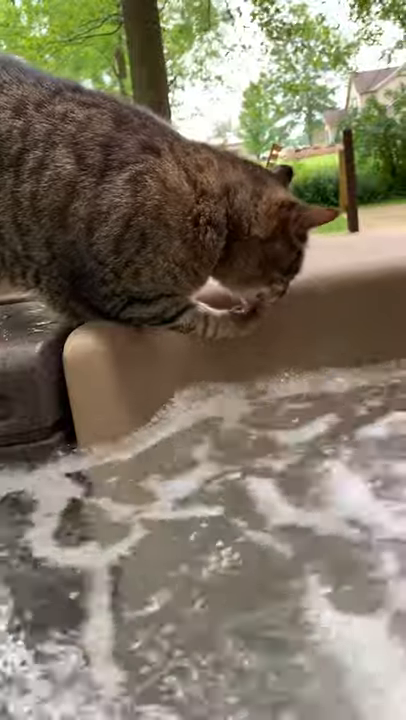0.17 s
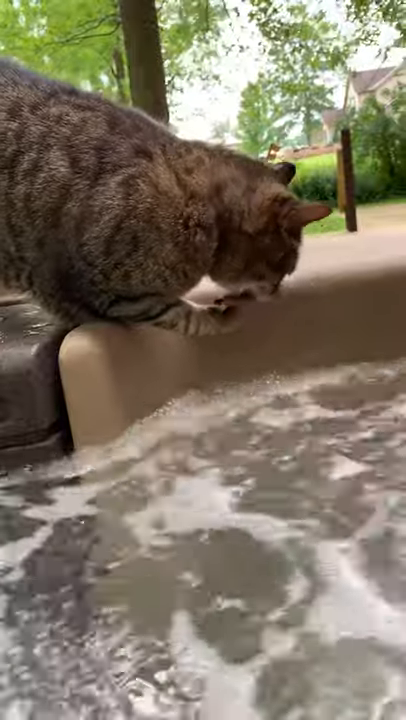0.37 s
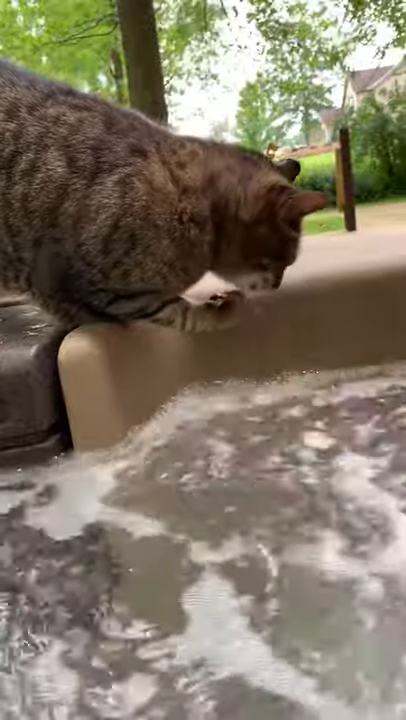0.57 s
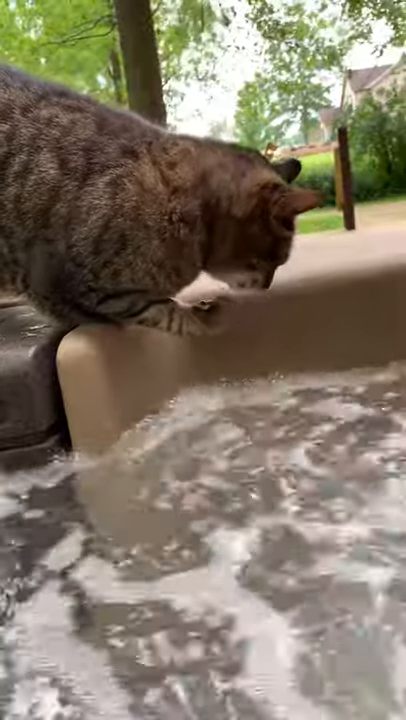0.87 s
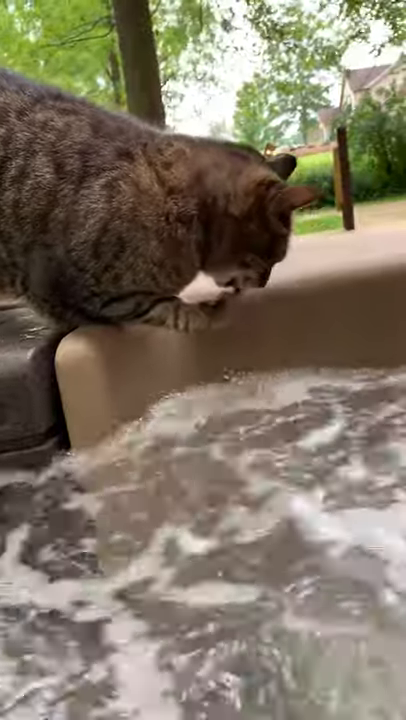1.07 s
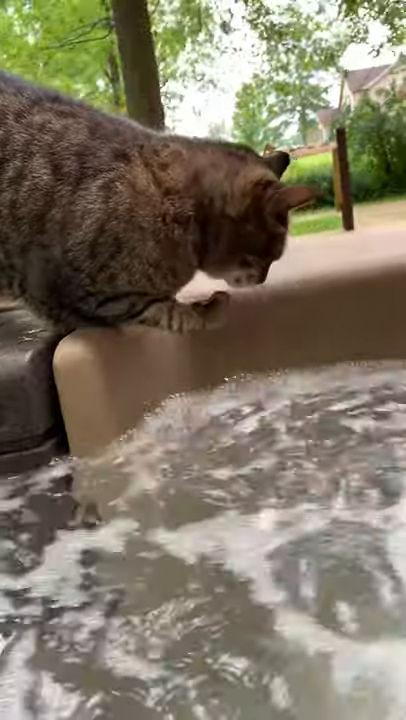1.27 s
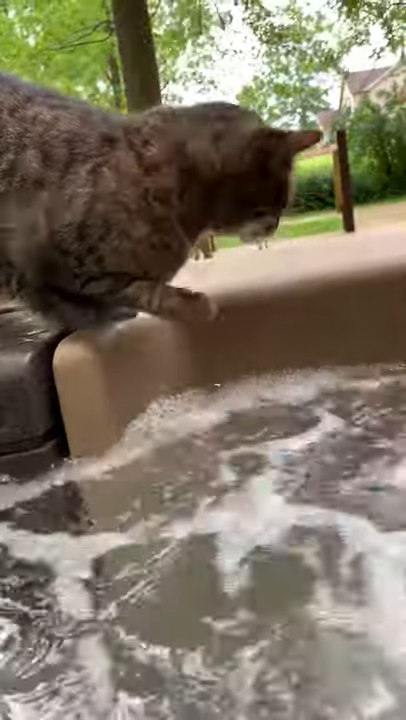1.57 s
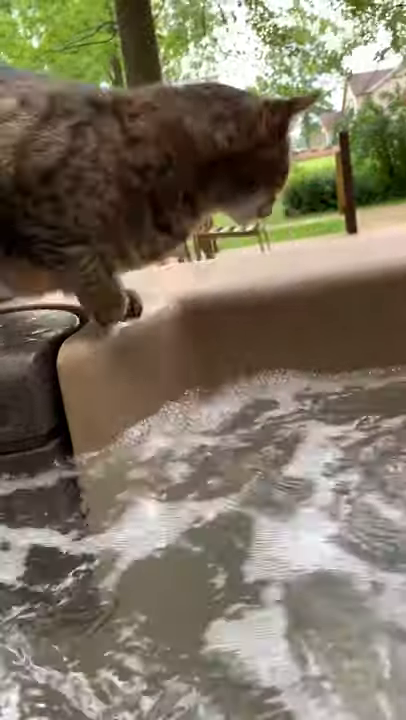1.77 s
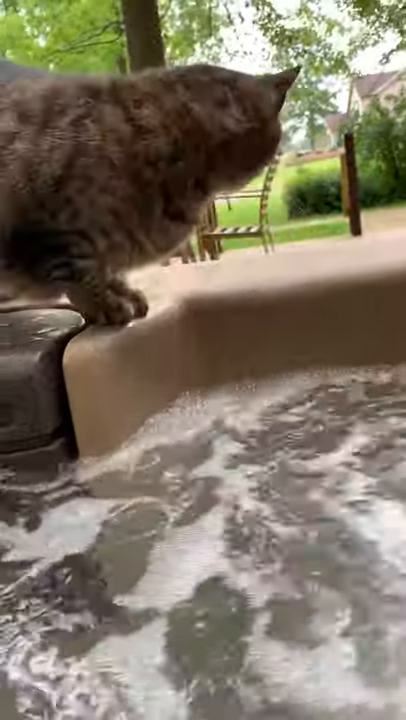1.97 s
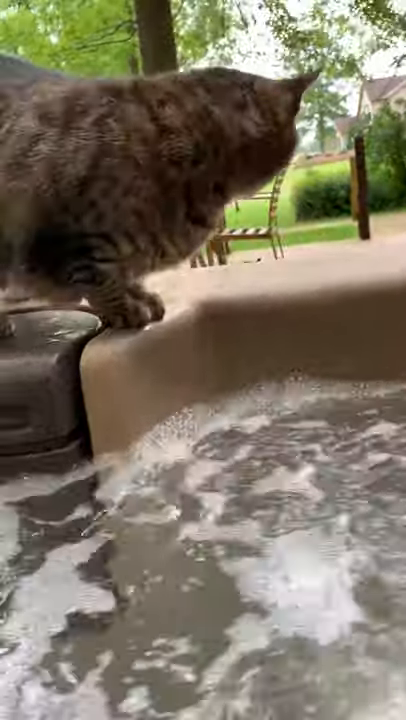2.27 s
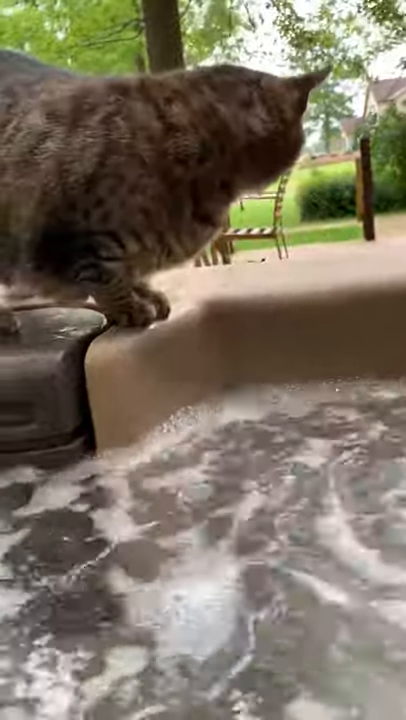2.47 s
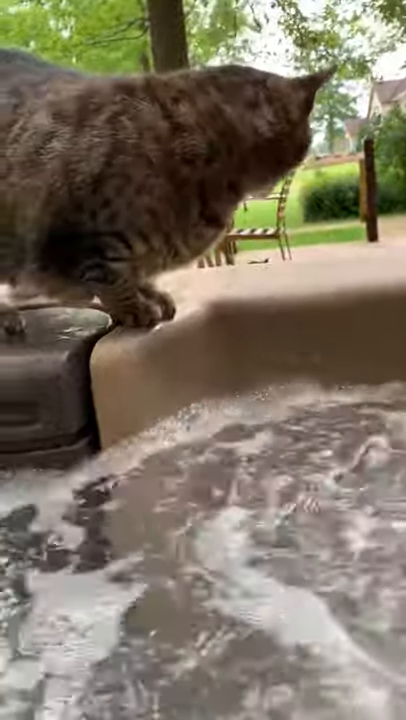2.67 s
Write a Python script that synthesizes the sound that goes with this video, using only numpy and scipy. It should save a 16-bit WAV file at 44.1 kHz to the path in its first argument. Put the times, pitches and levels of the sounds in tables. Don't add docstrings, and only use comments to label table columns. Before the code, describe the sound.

Hot tub jets churn water steadily, close to a phone outdoors: low surging rumble, gurgling bubbles and hissing foam, with scattered gulps, plops and drips, and a very faint distant bird whistling later on.

```python
import sys
import numpy as np
from scipy import signal
from scipy.fft import rfft, irfft, next_fast_len
from scipy.io import wavfile
from scipy.ndimage import uniform_filter1d, map_coordinates

SR = 44100
rng = np.random.default_rng(int(sys.argv[2]) if len(sys.argv) > 2 else 0)


def transcribe(u):
    v = np.clip(np.atleast_2d(u).T, -1, 1)
    q = np.round(v * 32767).astype(np.int16)
    wavfile.write(sys.argv[1], SR, q)


def makeup_ratio(level_db):
    decades = np.asarray(level_db, float) / 20
    return 10 ** decades


N = 125244
TIME_S = np.arange(N) / SR


def unit(x):
    return x / np.sqrt(np.mean(x ** 2) + 1e-20)


def along(points, hz):
    f, v = np.transpose(points)
    return np.interp(np.log(hz + 1), np.log(f + 1), v)


def over_time(points):
    return np.interp(TIME_S, *np.transpose(points))


def wobble(rate_hz):
    knots = rng.standard_normal(int(N * rate_hz / SR) + 4)
    return map_coordinates(knots, [np.arange(N) * rate_hz / SR])


def filtered(x, response):
    m = next_fast_len(N + 8192)
    return irfft(rfft(x, m) * response(np.fft.rfftfreq(m, 1 / SR)), m)[..., :N]


def rush(spectrum, patchy_db):
    z = signal.stft(rng.standard_normal((2, N)), nperseg=512)[2]
    field = uniform_filter1d(rng.standard_normal(z.shape[1:]), size=5, axis=0)
    field = uniform_filter1d(field, size=8, axis=1)
    pair = signal.istft(z * makeup_ratio(patchy_db * unit(field)), nperseg=512)[1][:, :N]

    def colour(hz):
        inside = (hz > spectrum[0][0]) & (hz < 1.5 * spectrum[-1][0])
        return makeup_ratio(along(spectrum, hz)) * inside
    return unit(filtered(pair, colour))


def bubbles(start_s, peak, pitch_hz, cycles, size_max):
    k = np.arange(size_max)
    life = k / SR * (pitch_hz / cycles)[:, None]
    rise = .05
    turns = cycles[:, None] * life * (1 + rise / 2 * np.minimum(life, 2))
    envelope = peak[:, None] * np.e * life * 2 * np.exp(-2 * life)
    wave = envelope * np.sin(2 * np.pi * turns)
    at = (start_s * SR).astype(int)[:, None] + k
    return np.bincount(at.ravel(), wave.ravel(), N + size_max)[:N]


def swarm(count, hz, octaves, cycles, spread_db, size_max):
    largest = .96

    def crowd():
        draw, z = rng.random((count, 2)), rng.standard_normal((count, 2))
        start_s = draw[:, 0] * N / SR
        peak = makeup_ratio(-spread_db * np.log(1 - largest * draw[:, 1]))
        pitch_hz = np.clip(hz * 2 ** (octaves * z[:, 0]), 250, 15000)
        return bubbles(start_s, peak, pitch_hz, cycles * np.exp(.4 * z[:, 1]), size_max)
    return unit(np.array([crowd(), crowd()]))


def air_pockets(surge_db):
    # freq_hz, level_db (per Hz)
    rumble_colour = [(12, -34), (20, -4), (92, 0), (160, -4), (210, -34), (350, -120)]
    steady, pocket_s = .85, .04
    rumble = rush(rumble_colour, patchy_db=.6)
    swell = np.abs(uniform_filter1d(rumble ** 2, size=int(pocket_s * SR))) + 1e-3
    return makeup_ratio(surge_db) * unit(rumble / swell ** (steady / 2))


def churn(swing_db):
    # freq_hz, level_db (per Hz)
    churn_colour = [(100, -30), (160, -4), (360, -3), (420, -8), (520, -6.5), (720, -14), (1250, -17),
                    (3600, -41)]
    # time_s, gain_db
    boil = [
        (0.1, 0),
        (.4, .8),
        (.55, -1),
        (.85, 1.5),
        (1.15, -.5),
        (1.4, 1),
        (1.9, -1),
        (2.3, -1),
        (2.45, -2),
        (2.8, 0),
    ]
    churn_db, bubbles_db, follow = -36.4, -53, .06
    gurgle = swarm(count=900, hz=1100, octaves=.9, cycles=5, spread_db=4, size_max=1000)
    body = makeup_ratio(churn_db) * rush(churn_colour, patchy_db=1.2) + makeup_ratio(bubbles_db) * gurgle
    return body * makeup_ratio(follow * swing_db + over_time(boil) + .3 * wobble(3) + .9 * wobble(17))


def foam(swing_db):
    # freq_hz, level_db (per Hz)
    foam_colour = [(500, -20), (1900, -2.5), (3400, -1.5), (5000, .4), (7000, -.5), (9500, -2),
                   (12000, -5.6), (15500, -9.5)]
    foam_db, sizzle_db, follow = -42.8, -56, .03
    sizzle = swarm(count=4000, hz=7000, octaves=.7, cycles=2.5, spread_db=4, size_max=100)
    body = makeup_ratio(foam_db) * rush(foam_colour, patchy_db=.7) + makeup_ratio(sizzle_db) * sizzle
    return body * makeup_ratio(follow * swing_db + .3 * wobble(4) + .4 * wobble(25))


def water():
    # time_s, level_db
    surge = [(0.1, -42), (1.0, -38), (1.05, -50), (1.1, -39), (1.2, -38), (1.23, -45), (1.3, -33),
             (1.35, -44), (1.38, -35), (1.43, -44), (1.47, -30), (1.73, -41), (2.1, -37), (2.16, -42),
             (2.19, -30), (2.23, -39), (2.81, -40), (2.83, -45)]
    surge_db = over_time(surge)
    swing_db = surge_db - surge_db.mean()
    return air_pockets(surge_db) + churn(swing_db) + foam(swing_db)


def drops():
    # start_s, peak_db, pitch_hz, life_cycles
    plinks = [(.4147, -37, 2720, 8), (.416, -42, 2100, 4), (.6117, -37, 2850, 7), (.616, -42, 1270, 12),
              (.636, -43, 2950, 14), (.642, -44, 3250, 16), (.712, -44, 3500, 30), (.926, -43, 2250, 20),
              (1.18, -39, 1250, 10), (1.29, -42, 1050, 16), (1.305, -43, 2650, 18), (2.2973, -43, 2610, 10),
              (2.6984, -44, 2870, 10), (2.255, -45, 3000, 20), (.265, -44, 2090, 6), (1.2607, -43, 2230, 5),
              (1.997, -44, 1970, 6), (2.15, -45, 3450, 25), (.478, -42, 1300, 6), (1.138, -41, 1000, 6),
              (1.262, -39, 1050, 9), (1.85, -46, 1550, 18), (2.656, -39, 900, 6), (2.714, -38, 1280, 9),
              (2.712, -40, 1520, 9), (.416, -36, 2300, 1.6), (.613, -37, 1900, 1.6), (1.515, -30, 45, 1.5),
              (2.175, -31, 94, 2.5), (2.8142, -38, 11000, 9), (2.8142, -36, 12400, 11),
              (2.8142, -37, 13700, 12)]
    # start_s, peak_db, pitch_hz
    gulps = [(0.328, -29, 205), (0.395, -29, 245), (0.525, -27, 258), (0.739, -29, 334), (0.801, -28, 218),
             (0.852, -26, 342), (1.109, -30, 188), (1.225, -30, 272), (1.372, -27, 172), (1.916, -28, 293),
             (1.999, -28, 205), (2.052, -28, 215), (2.172, -28, 350), (2.227, -28, 363), (2.314, -26, 312),
             (2.434, -31, 318), (2.573, -31, 213), (2.78, -27, 345)]
    # start_s, peak_db, pitch_hz
    plops = [(0.113, -35, 791), (0.398, -34, 614), (0.578, -34, 686), (0.601, -33, 643), (0.987, -32, 813),
             (1.077, -34, 918), (1.391, -35, 600), (1.434, -33, 633), (1.511, -34, 638), (1.625, -35, 1110),
             (1.684, -34, 1070), (1.811, -35, 638), (1.965, -35, 657), (1.998, -34, 649), (2.091, -32, 646),
             (2.267, -34, 678), (2.41, -35, 1070)]
    gulp_rows = [(s, peak_db - 8, pitch_hz, 5) for s, peak_db, pitch_hz in gulps]
    plop_rows = [(s, peak_db - 6, pitch_hz, 7) for s, peak_db, pitch_hz in plops]
    start_s, peak_db, pitch_hz, cycles = np.transpose(plinks + gulp_rows + plop_rows)
    return bubbles(start_s, makeup_ratio(peak_db), pitch_hz, cycles, size_max=4000)


def spray():
    # start_s, peak_db, pitch_hz, life_cycles
    droplets = [
        (1.3, -58, 4850, 60),
        (1.312, -58, 5050, 60),
        (1.325, -58, 4750, 60),
        (1.335, -59, 4950, 50),
        (2.8142, -46, 13000, 10),
        (.4155, -41, 1700, 2),
        (.6125, -41, 2300, 1.6),
    ]
    start_s, peak_db, pitch_hz, cycles = np.transpose(droplets)
    return bubbles(start_s, makeup_ratio(peak_db), pitch_hz, cycles, size_max=2000)


def bird():
    # start_s, length_s, peak_db, first_hz, last_hz
    whistles = [(1.47, .055, -50, 2680, 2620), (1.53, .05, -49, 2700, 2620), (1.605, .05, -46, 2400, 2440),
                (1.645, .055, -50, 2330, 2130), (1.73, .03, -52, 2100, 2150), (2.19, .03, -51, 2660, 2680),
                (2.225, .035, -51, 2650, 2620), (2.15, .06, -50, 3380, 3350), (2.742, .03, -48, 3170, 3150),
                (2.778, .025, -46, 3350, 3330), (2.808, .02, -47, 3450, 3320),
                (2.822, .03, -43, 3200, 3050)]
    start_s, length_s, peak_db, first_hz, last_hz = np.transpose(whistles)[:, :, None]
    part = np.clip((TIME_S - start_s) / length_s, 0, 1)
    turns = length_s * (first_hz * part + (last_hz - first_hz) * part ** 2 / 2)
    tone = np.sin(2 * np.pi * turns + .9 * wobble(60))
    flutter = makeup_ratio(.4 + 1.8 * wobble(90))
    return np.sum(makeup_ratio(peak_db) * np.sin(np.pi * part) * tone * flutter, axis=0)


def ports(pair):
    # freq_hz, correlation
    alike = [(120, .99), (330, .96), (600, .62), (850, .2), (1300, .68), (2800, .5), (4300, .83),
             (6000, .995)]
    # freq_hz, phase_rad
    phase_lead = [(80, -.06), (350, -.3), (640, -.75), (1200, .1), (1900, .3), (2700, 1.2), (4250, 1.85),
                  (4890, 3.14)]
    # freq_hz, balance_db
    tilt = [(120, -.1), (330, -.4), (850, -2.2), (1500, -1), (2500, -.3), (3600, .4), (5000, .05)]
    # time_s, level_db (re foam)
    stray_bursts = [(0.1, -24), (1.1, -22), (1.2, -17), (1.3, -22), (1.42, -22), (1.5, -14), (1.62, -17),
                    (1.93, -15), (2.1, -17), (2.35, -14), (2.45, -22), (2.75, -17)]
    lead_s, lead_from_hz, stray_from_hz = .000241, 4880, 6500

    def split(hz):
        angle = np.arccos(np.clip(along(alike, hz), -1, 1)) / 2
        return [np.cos(angle), np.sin(angle)]

    half = np.array([[.5], [-.5]])

    def port_response(hz):
        lead_rad = along(phase_lead, hz) + 2 * np.pi * lead_s * np.maximum(hz - lead_from_hz, 0)
        return makeup_ratio(half * along(tilt, hz)) * np.exp(1j * half * lead_rad)

    shared, apart = filtered(pair, split)
    stray = makeup_ratio(over_time(stray_bursts) + 2.2 * wobble(14))
    apart = apart + stray * filtered(pair[1], lambda hz: hz > stray_from_hz)
    return filtered(np.array([shared + apart, shared - apart]), port_response)


def scene():
    near_left = np.array([[1], [.5]])
    return ports(water() + (drops() + bird()) * near_left) + spray()


def roll_off(x):
    return signal.sosfilt(signal.butter(12, 17090, fs=SR, output="sos"), x)


def record(dry):
    ceiling, hardness = .13, 3.5
    top_hz, start_s = 15750, .08417
    soft = dry / (1 + np.abs(dry / ceiling) ** hardness) ** (1 / hardness)
    dull = filtered(soft, lambda hz: hz < top_hz)
    mix = dull * (np.arange(N) >= start_s * SR)
    return roll_off(mix)


dry = scene()
out = record(dry)
transcribe(out)
```